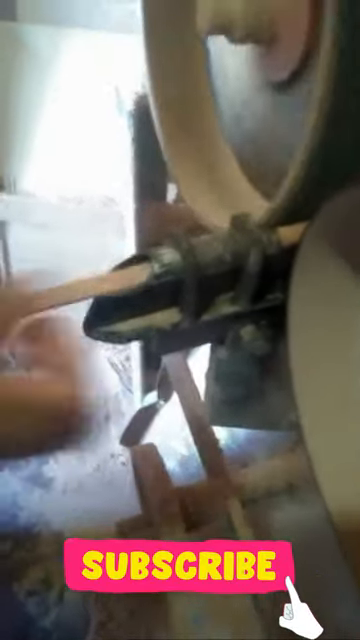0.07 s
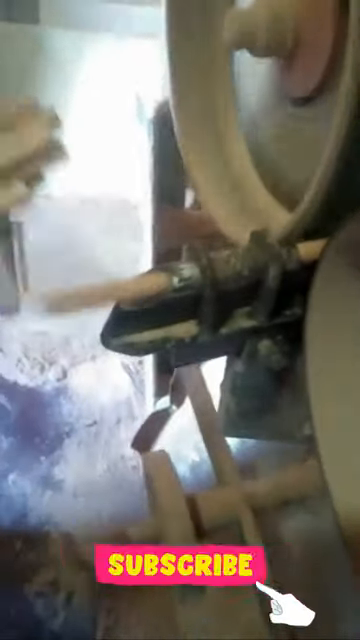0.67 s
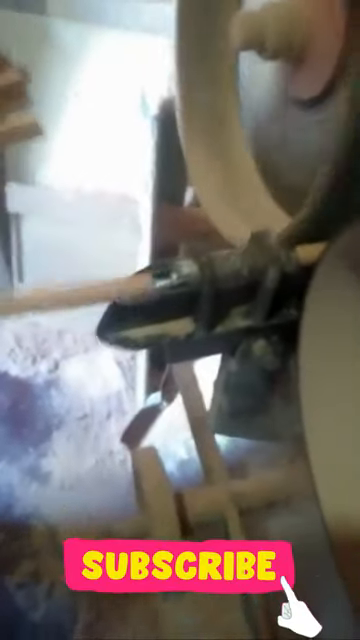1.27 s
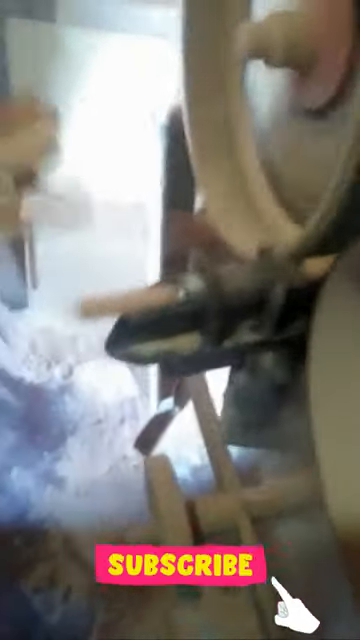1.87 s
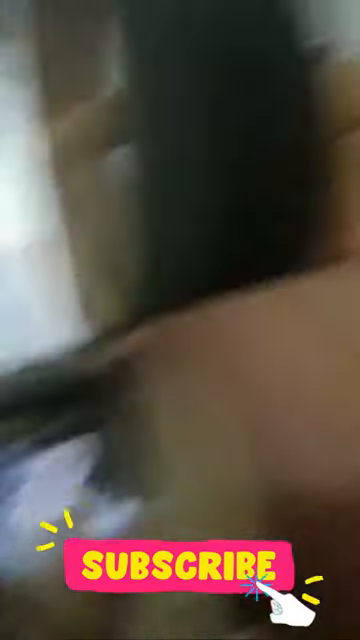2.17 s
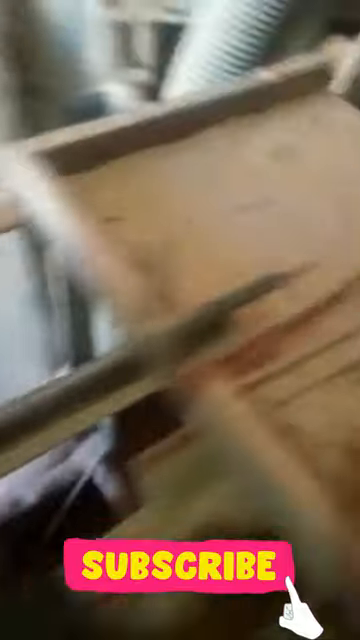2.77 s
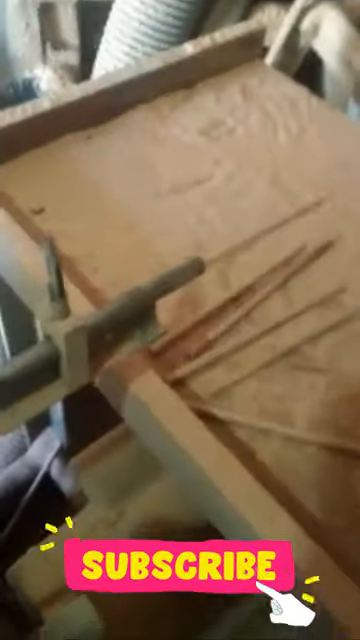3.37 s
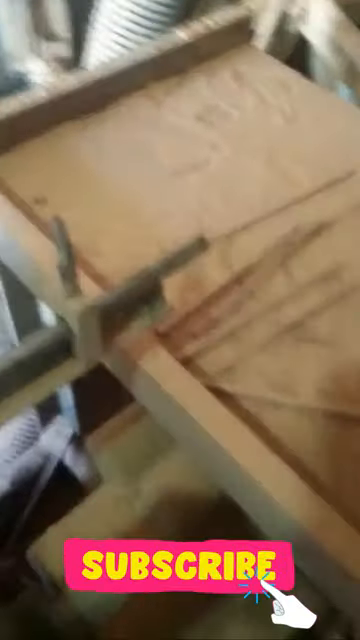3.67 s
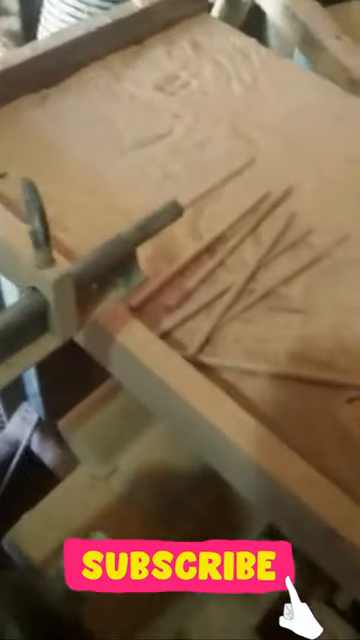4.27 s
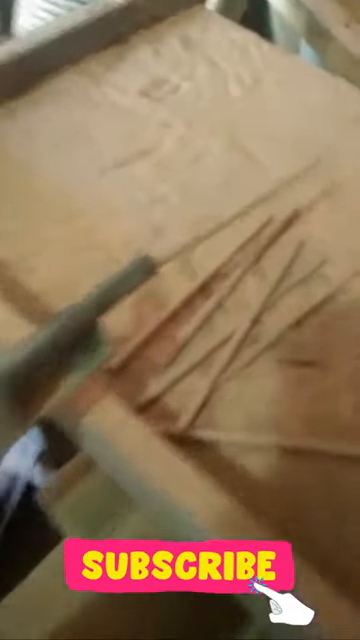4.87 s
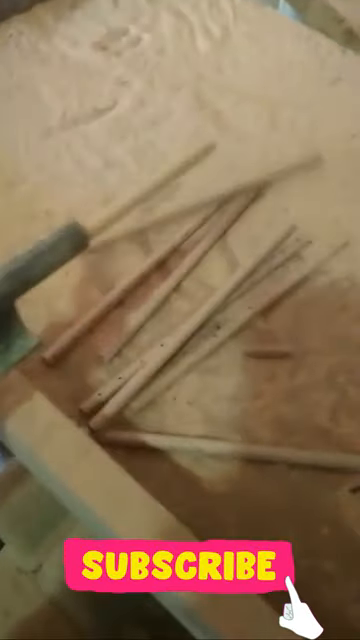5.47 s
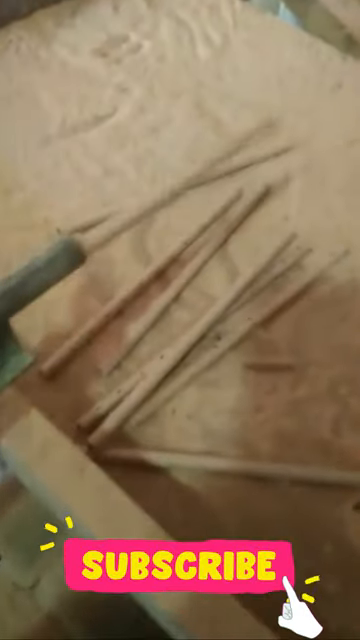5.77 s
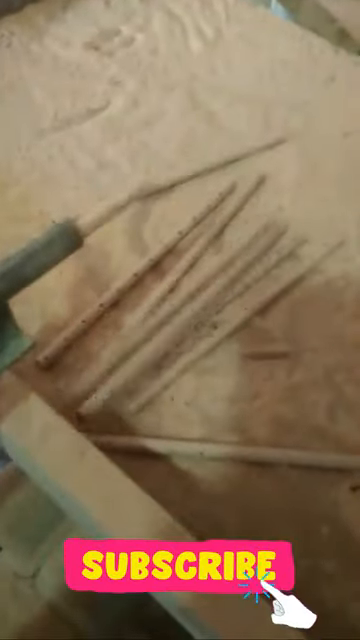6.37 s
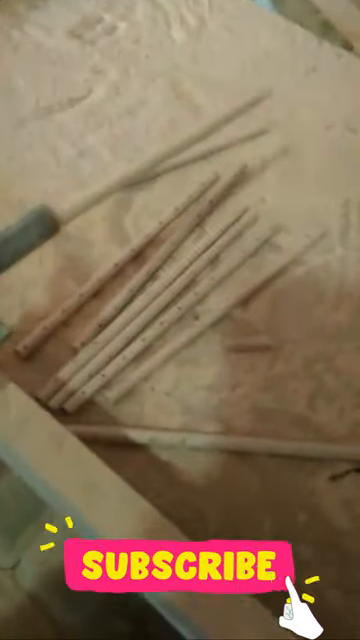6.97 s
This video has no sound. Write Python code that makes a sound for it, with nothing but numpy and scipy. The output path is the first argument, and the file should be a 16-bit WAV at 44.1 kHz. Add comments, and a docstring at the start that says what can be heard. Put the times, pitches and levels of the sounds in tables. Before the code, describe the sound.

A piercing, fluttering shriek runs throughout as a workshop machine shaves wooden rods close to the microphone. Each new rod brings a fresh rasp of tearing wood and a hiss of chips, with chatter in the steel guide. Partway through, the sound shifts from the feed side to the outlet, with more rumble, scattered knocks of sticks dropping, and short rough squeaks over a dry scraping hiss.

```python
"""A rod rounding machine shaves thin wooden sticks, one after another.
From the start, heard where the rods go in, the knives squeal and rasp, chips spray, rods rattle in the
guide tube and the drive rumbles. The squeal is so loud that it keeps the microphone's fast limiter working.
Soon a scraping hiss swells, rods knock against the guide, and they squeak as they bind in it.
From about 2.7 s we listen at the tray where the rods come out, and the drive is louder there."""
import sys
import numpy as np
from scipy import signal
from scipy.fft import rfft, irfft, next_fast_len
from scipy.io import wavfile
from scipy.ndimage import uniform_filter1d

SR = 44100
rng = np.random.default_rng(int(sys.argv[2]) if len(sys.argv) > 2 else 0)


def generate_wav(sig):
    """Save sig (samples, or channels by samples) to the path in sys.argv[1] as 16-bit PCM at SR."""
    pcm = np.round(np.clip(np.atleast_2d(sig).T, -1, 1) * 32767).astype(np.int16)
    wavfile.write(sys.argv[1], SR, pcm)


N = 313551
TIME = np.arange(N) / SR

# where the microphone is: (time [s], place [0 = where rods go in, 1 = where they come out])
MIC_PLACE = [(2.7, 0.017), (2.78, 1)]
# each rod meeting the knives:
# (time [s], pause before it [s], steady cutting [s], rasp [dB], chips [dB], rattle [dB])
ROD_CUTS = [(0.0, 0.01, 0.015, -32, -44, -45), (0.496, 0.12, 0.55, -31.5, -40.5, -45),
            (1.76, 0.12, 0.7, -32, -42.5, -44), (2.82, 0.06, 0.6, -35, -44, -42),
            (3.947, 0.099, 0.24, -38.5, -41.5, -40), (5.08, 0.087, 0.25, -37, -41.5, -41.5),
            (6.385, 0.278, 0.16, -35, -44, -42.5)]


def amp(db):
    """Turns decibels into a number to multiply by."""
    return 10 ** (np.asarray(db) / 20)


def unit(x):
    """Scales a signal to an average strength (rms) of 1."""
    return x / np.sqrt(np.mean(x ** 2) + 1e-20)


def curves(rows):
    """Joins a table's rows with straight lines over time, one curve for each value column."""
    times, *columns = np.transpose(rows)
    return [np.interp(TIME, times, column) for column in columns]


def noise():
    """An even hiss (white noise)."""
    return rng.standard_normal(N)


def colour(x, spectrum):
    """Makes some frequencies stronger and others weaker; the result has strength 1."""
    hz, db = np.transpose(spectrum)
    freqs = np.fft.rfftfreq(N, 1 / SR)
    gain = amp(np.interp(np.log(freqs + 1), np.log(hz), db))
    return unit(irfft(rfft(x) * gain, N))


def wander(per_s):
    """A smooth random wobble of strength 1, with up to about per_s swings a second."""
    count = 4096
    freqs = np.fft.rfftfreq(count, N / SR / count)
    slow = irfft(rfft(rng.standard_normal(count)) / (1 + (freqs / per_s) ** 4))
    return unit(np.interp(TIME, np.linspace(0, N / SR, count), slow))


def resonate(x, hz, width_hz, order=2):
    """Makes x ring around a pitch that may move; a higher order shuts out more of the rest."""
    turn = np.exp(2j * np.pi * np.cumsum(hz * np.ones(N)) / SR)
    decay = np.exp(-np.pi * width_hz / SR)
    shifted = x / turn  # slide the pitch down to 0 Hz, smooth it, then slide it back
    for _ in range(order):
        shifted = signal.lfilter([1 - decay], [1, -decay], shifted)
    return unit((shifted * turn).real)


def grains(per_s, spread_db):
    """Tiny random hits of uneven size."""
    size = amp(spread_db * np.minimum(rng.exponential(1, N), 4))
    return unit(noise() * size * (rng.random(N) < per_s / SR))


def churn(x, depth_db, patch_hz, patch_s):
    """Echoes from the room drift as the microphone moves, so patches of the spectrum swell and fade at random."""
    slices = signal.stft(x, nperseg=512, noverlap=384)[2]
    span = np.maximum([patch_hz * 512 / SR, patch_s * SR / 128], .3)
    patches = rng.standard_normal(slices.shape)
    for axis in (0, 1):  # blur across frequency, then across time
        blur = np.exp(-.5 * (np.arange(-40, 41) / span[axis] * 2) ** 2)
        patches = signal.fftconvolve(patches, np.expand_dims(blur, 1 - axis), "same")
    slices = slices * amp(depth_db * unit(patches))
    return unit(signal.istft(slices, nperseg=512, noverlap=384)[1][:N])


def squeal():
    """The knives stick and slip on the spinning rod: a wavering shriek, and the cutter head rings."""
    # the squeal's course: (time [s], level [dB], shriek pitch [Hz], ring relative to the level [dB])
    course = [(0.0, -26, 6580, -4.5), (0.85, -25.5, 6520, -4), (1.1, -27.5, 6520, -9),
              (1.42, -25.5, 6620, -6), (2.33, -23.5, 6200, -3), (2.6, -29, 6330, -9), (2.88, -25, 6080, 1),
              (3.08, -23.5, 6230, -9), (4.55, -24.5, 6130, -5.5), (4.88, -26.5, 6200, -19),
              (5.04, -25.5, 6850, -16), (5.15, -25.5, 6580, -20), (6.15, -28, 6800, -11),
              (7.11, -29.5, 6450, -12)]
    # the knives lose their grip: (time [s], length [s], level change [dB], pitch change [Hz])
    slips = [(0.455, 0.028, -9, -350), (1.137, .07, 0.5, -150), (1.665, 0.053, -4.5, -100),
             (2.485, 0.046, -3, -100), (3.496, 0.037, -5, -100), (3.833, 0.069, 3.5, -600),
             (3.996, 0.04, -6, -50), (4.4, 0.025, -6, -50), (4.94, 0.075, -5, -1000),
             (5.535, 0.079, -3, -700), (6.715, .06, 0, -400)]
    # the cutter head favours some pitches of the shriek: (frequency [Hz], level [dB])
    head_spectrum = [(3800, -6), (4600, -7.5), (5000, 4.5), (5450, 1), (5780, 0), (6080, 1.5), (6300, -1),
                     (6600, -7.5), (6850, 0.5), (7100, -0.5), (7800, 0), (9500, 4)]
    level_db, pitch_hz, ring_db = curves(course)
    flutter = wander(14.5)  # louder and higher go together
    level_db += 1.27 * flutter
    pitch_hz += 60 * flutter
    for time, length, change_db, change_hz in slips:
        slip = np.exp(-(2 * (TIME - time) / length) ** 2)
        level_db += change_db * slip
        pitch_hz += change_hz * slip
        ring_db -= 5 * slip
    shriek = resonate(noise(), pitch_hz + 220 * wander(37), width_hz=2510, order=3)
    shriek = churn(colour(shriek, head_spectrum), depth_db=2.5, patch_hz=130, patch_s=.05)
    ring = resonate(noise(), 6500 + 65 * wander(18), width_hz=390)
    return amp(level_db) * (amp(-1) * shriek + amp(ring_db + 1 + 3.6 * wander(27)) * ring)


def cut_level(column, eased_in_db, eased_out_db, idle_db):
    """Level in dB from one ROD_CUTS column: each rod bites quickly, holds, then eases off."""
    bite_s, ease_s = 0.023, 0.49
    cuts = np.array(ROD_CUTS)
    entry, pause, hold = cuts.T[:3]
    rod = np.maximum(np.searchsorted(entry, TIME, side="right") - 1, 0)
    eased = np.clip((TIME - entry[rod] - hold[rod]) / ease_s, 0, 1)
    # 1 while the knives wait for the next rod, 0 while they cut
    idle = sum(np.clip(np.minimum(TIME - (time - gap), time - TIME) / bite_s + .5, 0, 1)
               for time, gap in zip(entry, pause))
    at_outlet, = curves(MIC_PLACE)
    eased_db = (1 - at_outlet) * eased_in_db + at_outlet * eased_out_db  # each side has its own change
    return uniform_filter1d(cuts[rod, column] + eased * eased_db, size=900) + idle * idle_db


def ringing_steel(tones):
    """The rod scrapes steel and makes it ring; each tone swells and fades as the contact shifts."""
    return unit(sum(amp(db + 3 * wander(20)) * resonate(noise(), hz, width) for hz, width, db in tones))


def rasp():
    """Tearing wood fibres shake the feed guide on the way in and the outlet tube on the way out."""
    # the tearing as heard on each side: (frequency [Hz], level [dB])
    inlet_spectrum = [(500, -30.5), (1100, -11), (1700, -9), (2300, -1.5), (3000, -1), (3600, 1), (4600, 0),
                      (5600, -8.5), (7500, -35), (11000, -85)]
    outlet_spectrum = [(500, -10), (1200, -6), (1750, -6.5), (2200, 1), (3000, 3), (3600, 1.5), (4500, 4),
                       (5600, 4.5), (7500, -39), (11000, -53)]
    # ringing tones of the steel guide and tube: (pitch [Hz], width [Hz], level [dB])
    guide_tones = [(1350, 49, -10.5), (1801, 21, -10.5), (2370, 240, -7), (3026, 120, 0), (4056, 220, -1)]
    tube_tones = [(1214, 200, -6), (1470, 29, -1.5), (1947, 56, -1.5), (2185, 114, 7), (3010, 610, 6),
                  (3964, 290, 8)]
    level_db = cut_level(column=3, eased_in_db=0.54, eased_out_db=0.5, idle_db=-3)
    at_outlet, = curves(MIC_PLACE)
    inlet = colour(grains(per_s=9000, spread_db=1.6), inlet_spectrum)
    inlet = churn(inlet, depth_db=1.5, patch_hz=200, patch_s=0.08)
    inlet += amp(-7.5) * ringing_steel(guide_tones)
    outlet = colour(grains(per_s=7000, spread_db=2.46), outlet_spectrum)
    outlet = churn(outlet, depth_db=3, patch_hz=194, patch_s=0.064)
    outlet += amp(-9) * ringing_steel(tube_tones)
    return amp(level_db + 1.5 + .5 * wander(30)) * ((1 - at_outlet) * inlet + at_outlet * outlet)


def chips():
    """Dust and splinters fly off in spurts with each bite of the knives and each knock."""
    # the high hiss of flying chips: (frequency [Hz], level [dB])
    spray_spectrum = [(3000, -22), (6000, -62), (8500, 4), (10000, 11), (11500, 9.5), (13100, 8),
                      (13550, 15.5), (13850, 5.5), (14400, -33)]
    level_db = cut_level(column=4, eased_in_db=-12.5, eased_out_db=-0.5, idle_db=-2.5)
    spray = colour(grains(per_s=12000, spread_db=1), spray_spectrum)
    spray = churn(spray, depth_db=1.3, patch_hz=500, patch_s=.02)
    spurts = amp(level_db + 1 + 1.2 * wander(28))
    splinters = amp(-4.5) * knocks()
    return (spurts + splinters) * spray


def rattle():
    """Rods chatter in the machine's frame, with a few harder knocks that die away."""
    # the shaken frame: (frequency [Hz], level [dB])
    frame_spectrum = [(40, -15), (160, -1.5), (330, -2), (520, -2.5), (900, -0.5), (1300, -2.5), (2000, -5),
                      (4000, -17.5)]
    level_db = cut_level(column=5, eased_in_db=-2, eased_out_db=-0.5, idle_db=-7.5)
    chatter = amp(level_db + wander(22)) * colour(grains(per_s=2500, spread_db=0.98), frame_spectrum)
    shaking = chatter + knocks() * colour(noise(), frame_spectrum)
    return np.std(shaking) * churn(shaking, depth_db=2.2, patch_hz=106, patch_s=0.046)


def drive():
    """Belts, feed wheels and the dust extractor make a rough rumble around the motor's hum."""
    # the drive, louder on the side where rods come out: (time [s], level [dB])
    loudness = [(0.0, -59), (0.7, -60), (0.84, -49), (1.0, -62), (1.6, -61), (2.15, -57.5), (2.77, -48.5),
                (4.6, -52.5), (7.11, -49)]
    # its deep rumble: (frequency [Hz], level [dB])
    rumble_spectrum = [(10, -2.5), (35, -14), (52, 2), (70, -1), (88, -1), (105, 1), (140, -7.5), (200, -9),
                       (400, -65), (1500, -66)]
    level_db, = curves(loudness)
    hum = resonate(noise(), hz=70, width_hz=30)
    throb = amp(1.3 * wander(16))
    rumble = colour(noise(), rumble_spectrum)
    return amp(level_db) * throb * (amp(-0.5) * rumble + amp(-8) * hum)


def scrape():
    """Dry wood slides over steel with a wide hiss."""
    # the scraping swells and fades: (time [s], level [dB])
    loudness = [(0, -52), (.45, -36), (.55, -33.5), (1.2, -47), (1.6, -48), (2.1, -30.5), (2.6, -47),
                (4.6, -34.5), (5.1, -31.5), (6.1, -33.5), (7.1, -32.5)]
    # its hiss: (frequency [Hz], level [dB])
    hiss_spectrum = [(3000, -20.5), (4700, 2.5), (6200, -5), (7600, 3.5), (8700, -1.5), (10000, -8),
                     (11500, -38), (14000, -32)]
    level_db, = curves(loudness)
    hiss = churn(colour(noise(), hiss_spectrum), depth_db=2.4, patch_hz=170, patch_s=.04)
    return amp(level_db) * hiss


def knocks():
    """How strong the knocks are at each moment: each one rises sharply and soon dies away."""
    # rods hit the guide or drop on the tray: (time [s], level [dB])
    hits = [(.588, -42), (.83, -43), (1.739, -40.5), (2.29, -43), (2.787, -33), (2.83, -36), (3.715, -41),
            (3.981, -35), (4.136, -36), (5.107, -35), (6.239, -39.5), (6.364, -35.5), (6.44, -41),
            (6.74, -37.5)]
    rise_s, fade_s = 0.0029, 0.35  # a knock falls by 60 dB in fade_s
    ages = [(np.maximum(TIME - time, 0), db) for time, db in hits]
    return sum(amp(db - 60 * age / fade_s) * (1 - np.exp(-age / rise_s)) for age, db in ages)


def squeaks():
    """A rod binds in its guide and rubs hard enough to sing: short rough tones that swell and fade."""
    # each rub: (start [s], end [s], first pitch [Hz], last pitch [Hz], width [Hz], level [dB])
    rubs = [(1.1, 1.837, 5120, 4470, 280, -34), (2.383, 2.7, 2920, 3120, 920, -31.5),
            (2.518, 2.75, 4550, 4740, 450, -32.5), (4.525, 5.015, 2180, 2190, 300, -41),
            (5.05, 5.55, 7000, 7240, 260, -34), (5.575, 5.62, 3040, 2980, 140, -37),
            (5.718, 5.96, 2020, 2070, 340, -38), (5.87, 5.93, 3040, 2960, 180, -37.5),
            (5.96, 6.02, 4010, 4000, 170, -34), (6.01, 6.08, 2200, 2020, 200, -35),
            (6.24, 6.36, 1230, 1240, 100, -47.5), (6.25, 6.62, 3000, 2900, 260, -48),
            (6.665, 6.795, 2920, 2950, 220, -37), (6.65, 6.767, 5400, 5200, 400, -35),
            (6.85, 6.91, 4800, 4840, 300, -33), (6.902, 7.11, 2180, 2240, 220, -42)]
    out = np.zeros(N)
    for start, end, first_hz, last_hz, width_hz, db in rubs:
        progress = np.clip((TIME - start) / (end - start), 0, 1)
        tone = resonate(noise(), first_hz + (last_hz - first_hz) * progress, width_hz)
        swell = np.sqrt(abs(np.sin(np.pi * progress)))
        out += amp(db) * swell * tone
    return out


def scene():
    """All parts of the machine reach one microphone, the same in both ears."""
    machine = squeal() + rasp() + chips() + rattle() + drive() + scrape() + squeaks()
    return np.array([machine, machine])


def limit(x, boost_db, ceiling_db, sharpness):
    """A limiter: boosts the sound, then turns it down almost instantly as it nears the ceiling."""
    boosted = x * amp(boost_db)
    strength = abs(signal.hilbert(boosted.mean(0), next_fast_len(N))[:N])
    strength = uniform_filter1d(strength, size=13)
    return boosted / (1 + (strength / amp(ceiling_db)) ** sharpness) ** (1 / sharpness)


def record(dry):
    """The microphone's limiter flattens the loudest peaks, then the highest treble is cut off."""
    limited = limit(dry, boost_db=1.98, ceiling_db=-18.5, sharpness=4.18)
    treble_cut = signal.firwin(1201, cutoff=14260, window=("kaiser", 9), fs=SR)
    return signal.oaconvolve(limited, treble_cut[None], "same", axes=1)


dry = scene()
out = record(dry)
generate_wav(out)
```